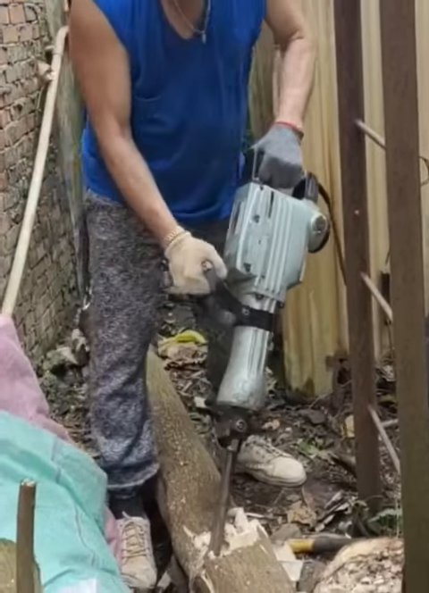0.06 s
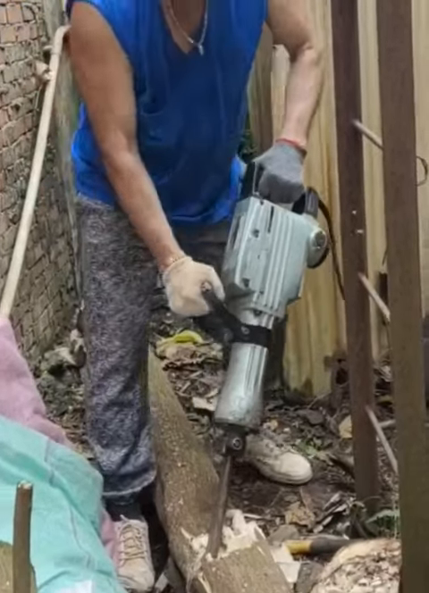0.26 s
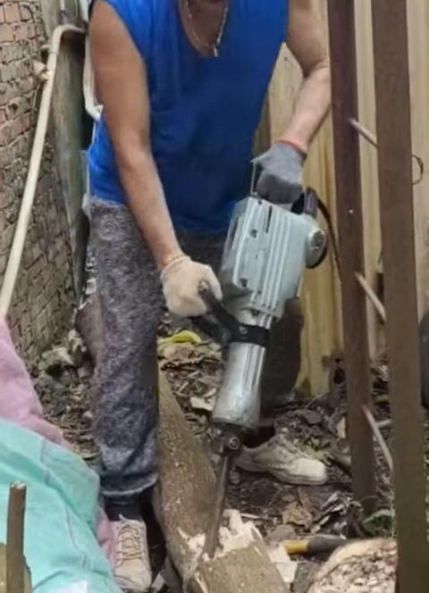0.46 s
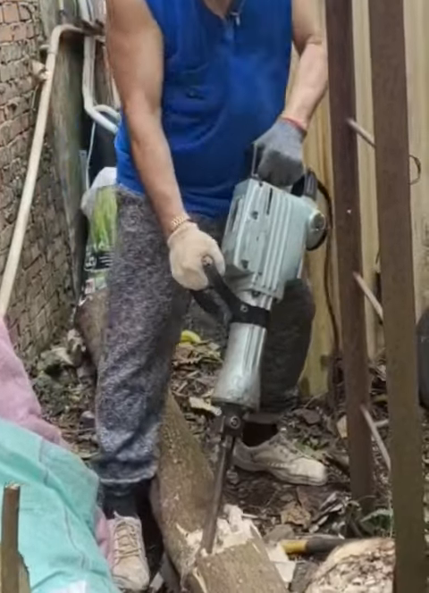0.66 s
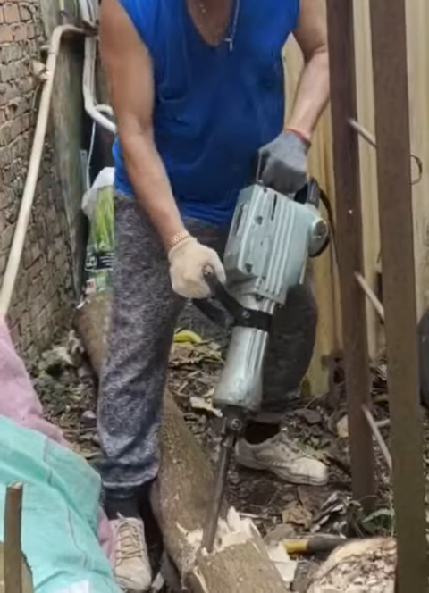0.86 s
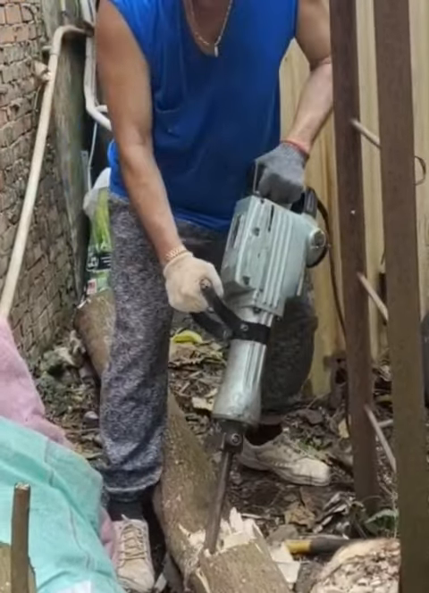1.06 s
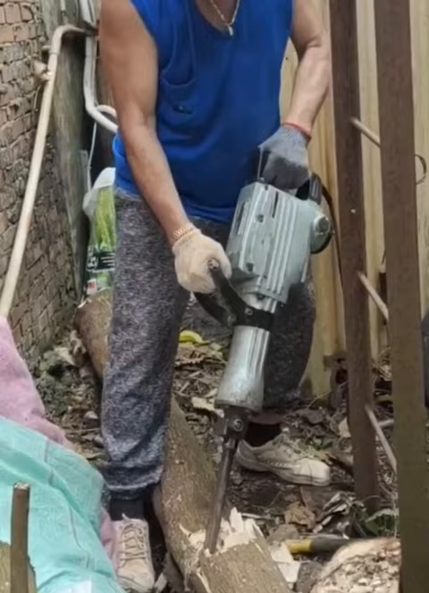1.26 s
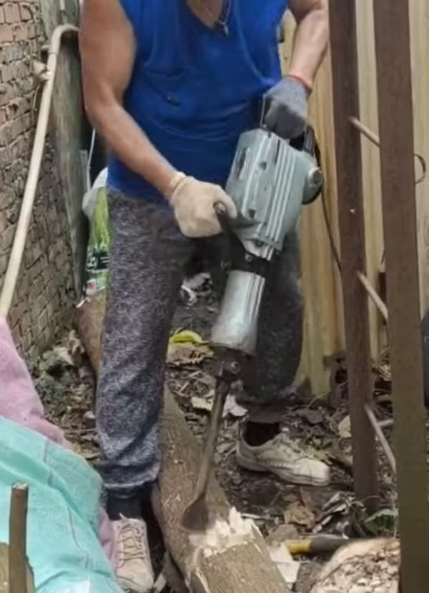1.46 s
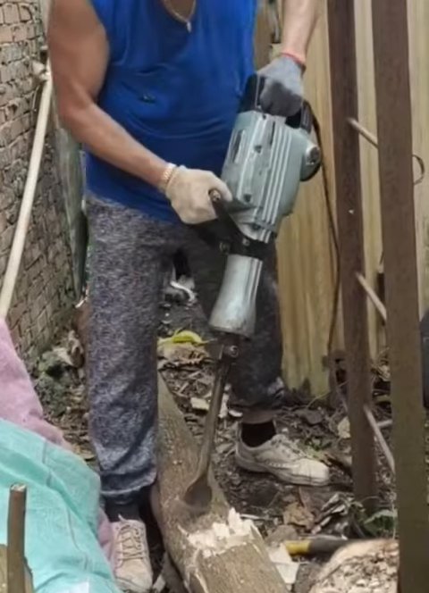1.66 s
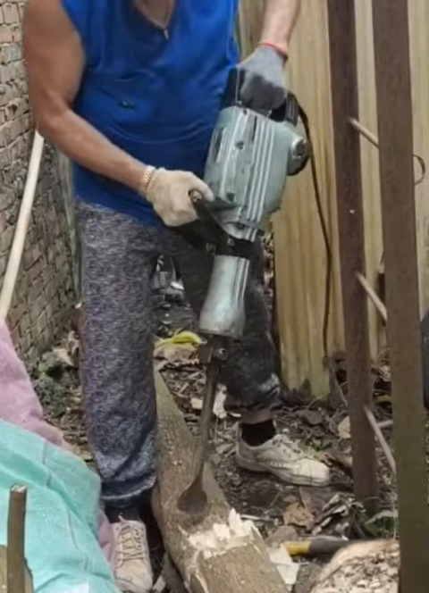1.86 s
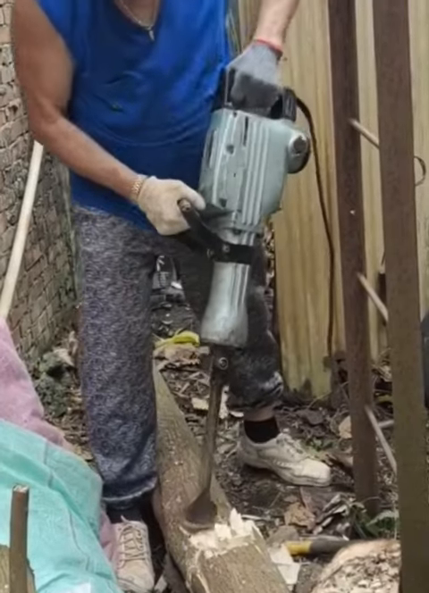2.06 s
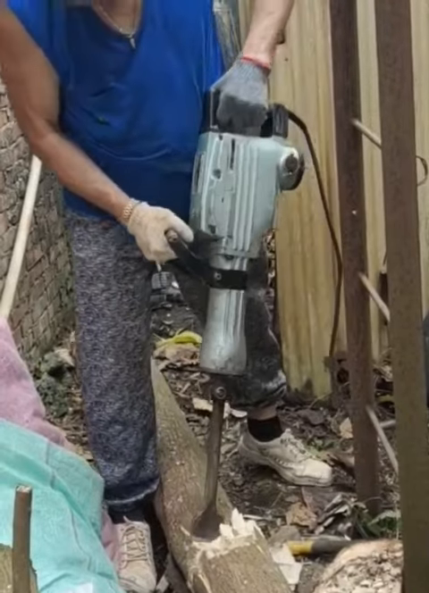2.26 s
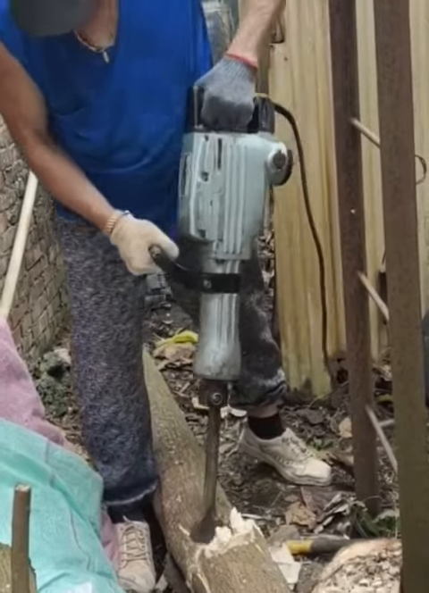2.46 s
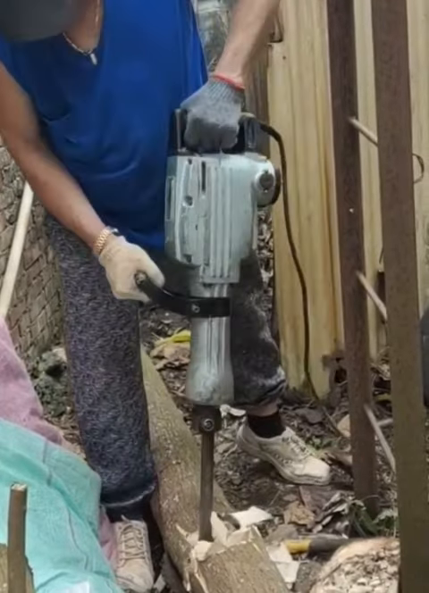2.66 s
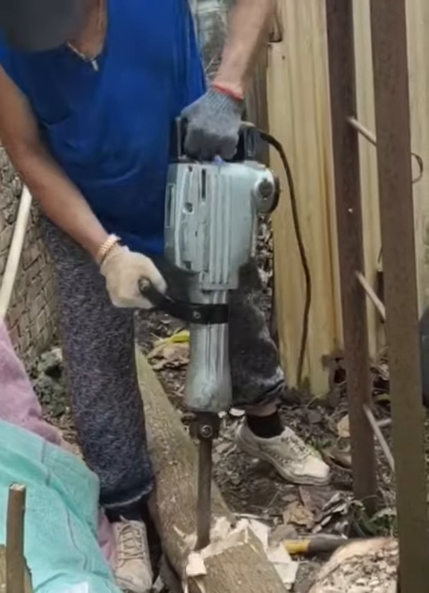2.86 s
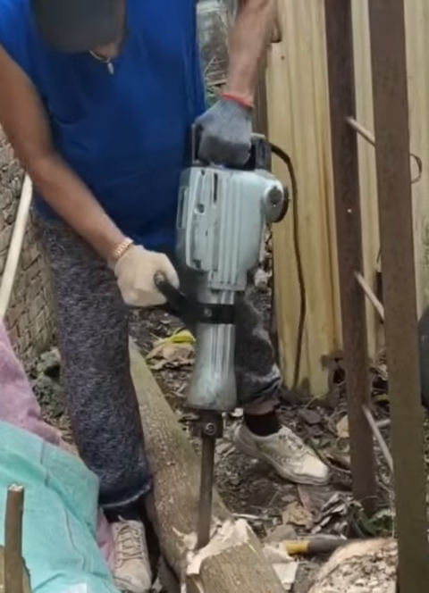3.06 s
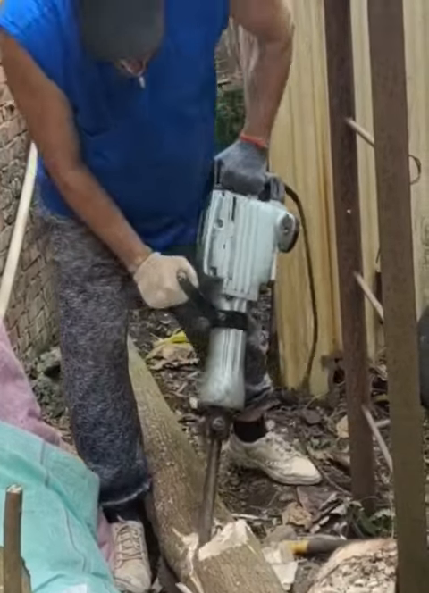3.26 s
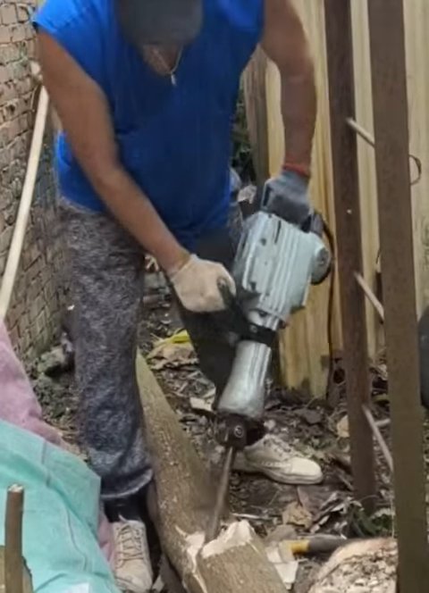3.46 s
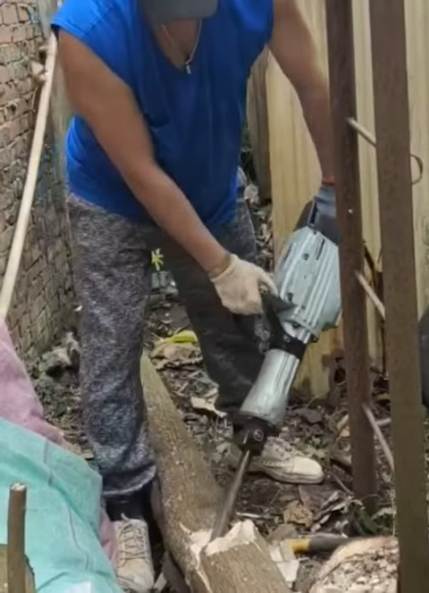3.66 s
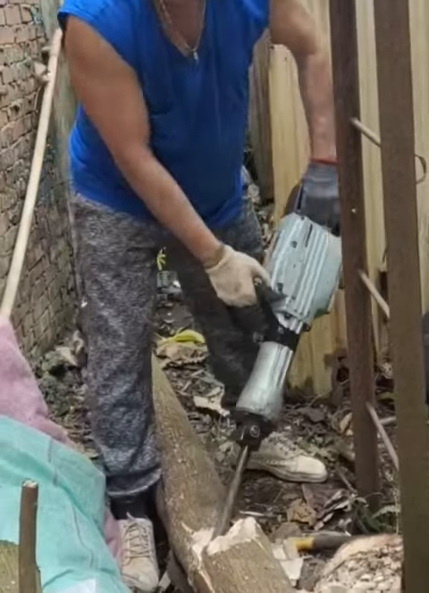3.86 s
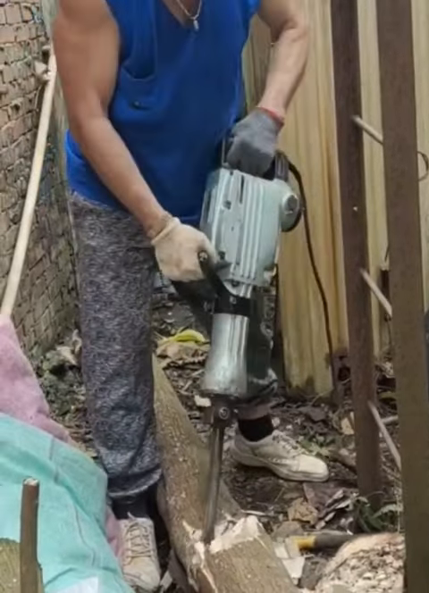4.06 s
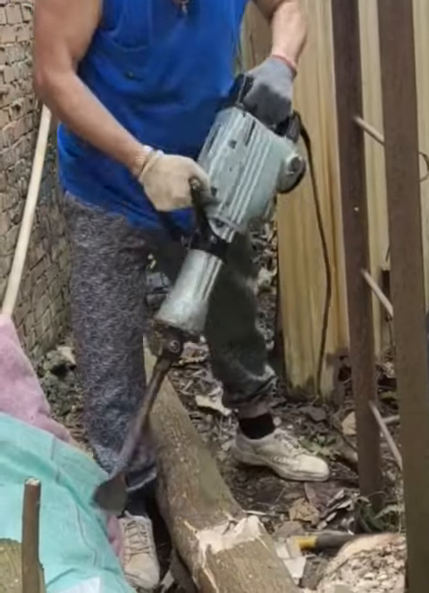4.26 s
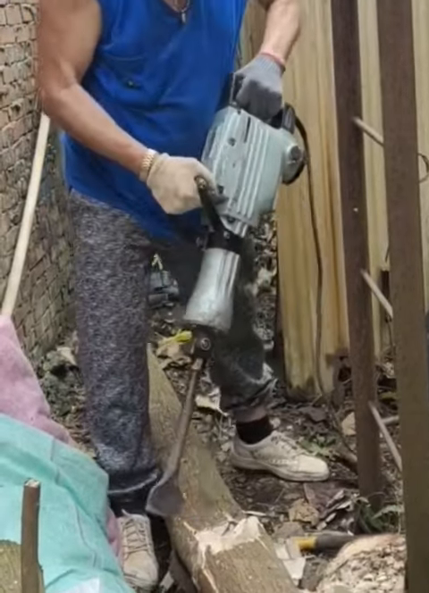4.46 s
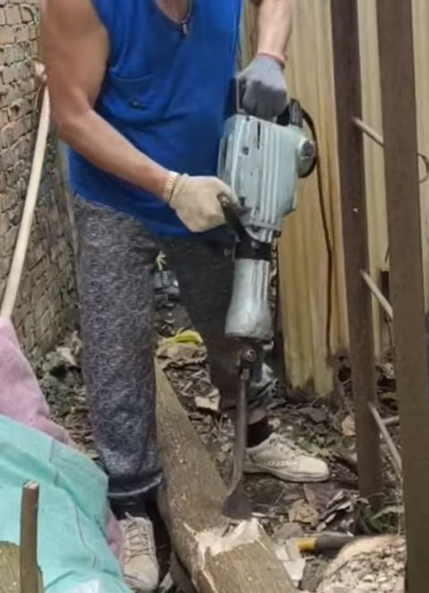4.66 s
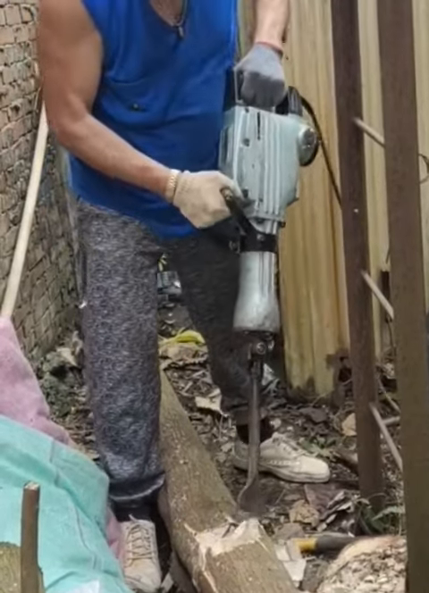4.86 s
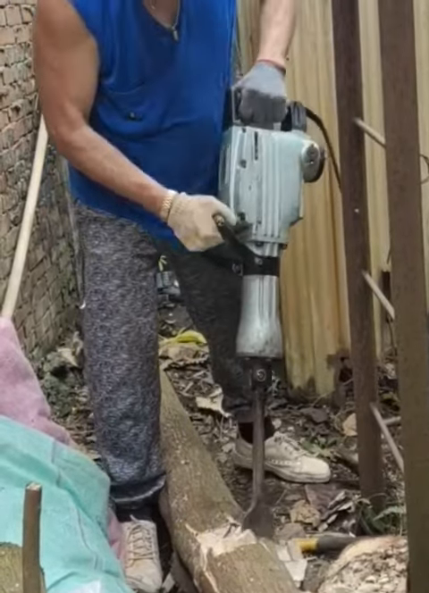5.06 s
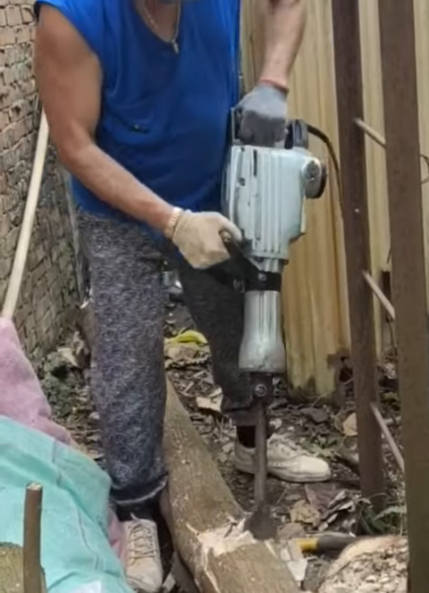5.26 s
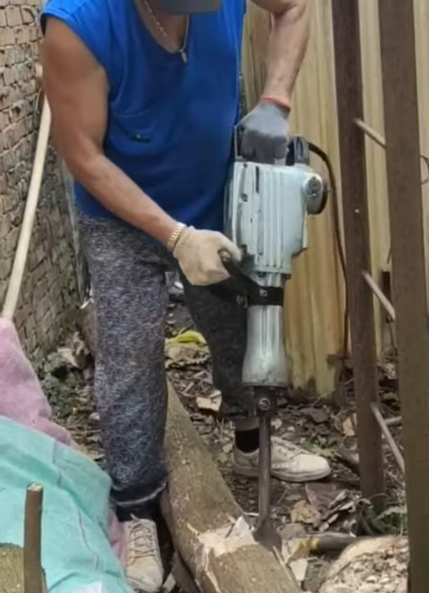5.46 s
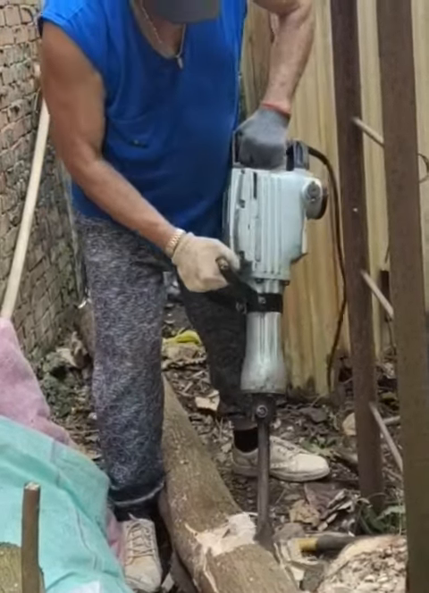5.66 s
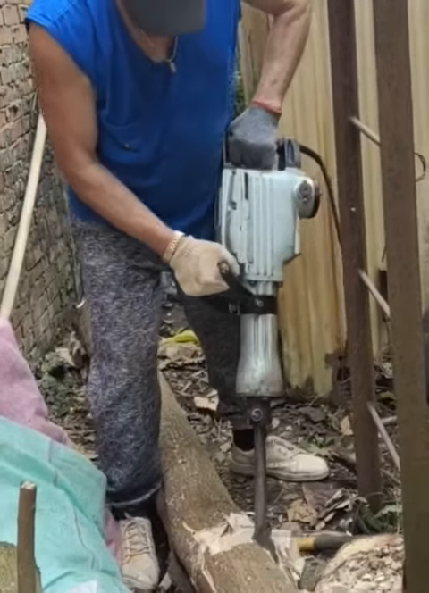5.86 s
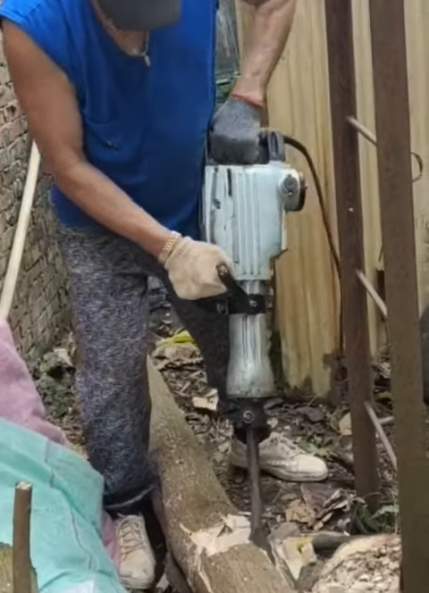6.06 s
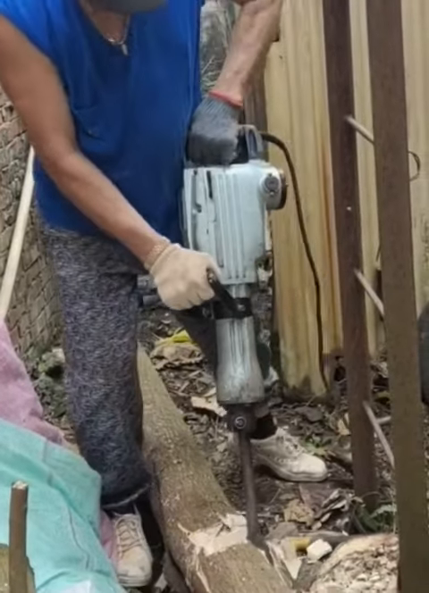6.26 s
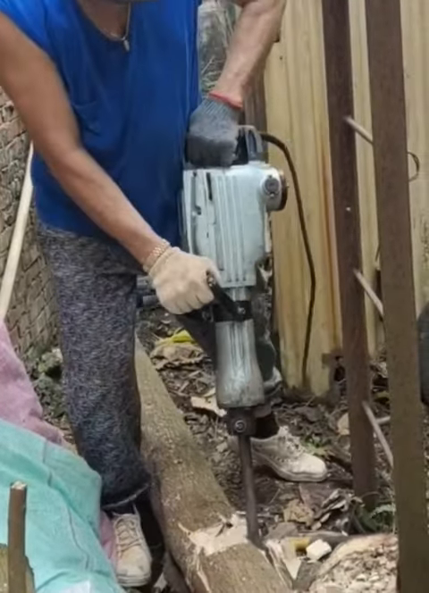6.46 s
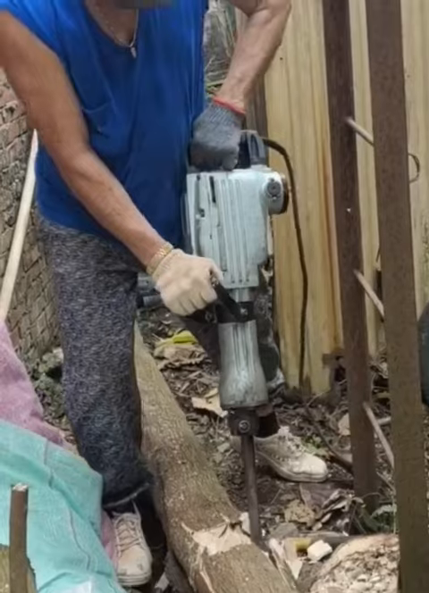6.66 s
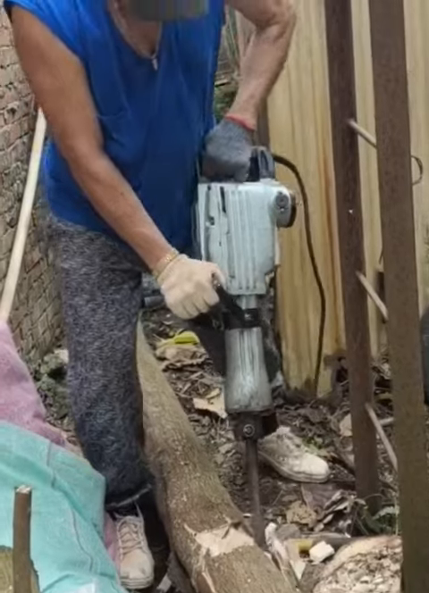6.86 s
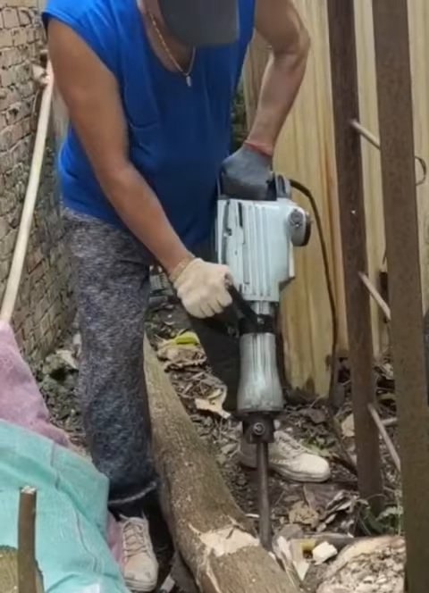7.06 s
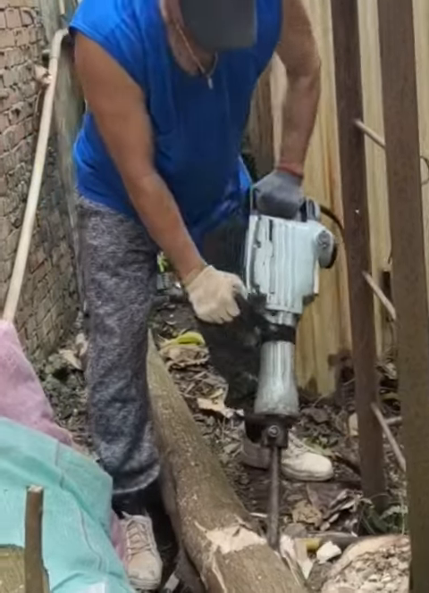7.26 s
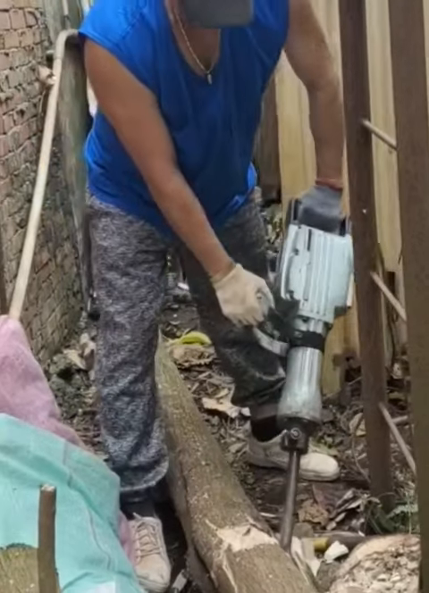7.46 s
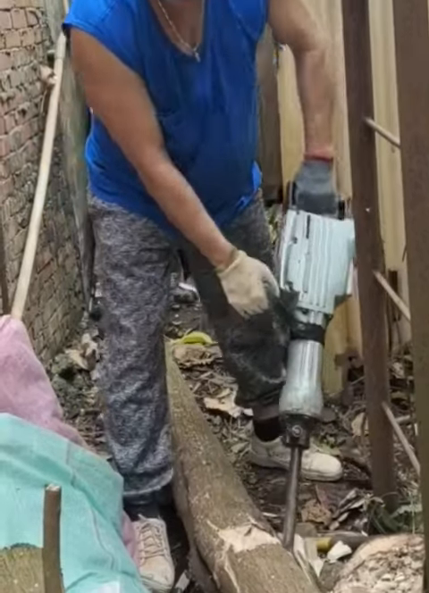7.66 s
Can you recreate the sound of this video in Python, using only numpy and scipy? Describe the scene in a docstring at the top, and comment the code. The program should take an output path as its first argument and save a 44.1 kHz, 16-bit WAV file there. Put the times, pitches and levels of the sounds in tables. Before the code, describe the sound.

Several single thuds of an idle hammer's blade into wood come first, each followed by light metal rattles and crumbly chips. Then the motor drives a rapid rattling run of blows, ringing steel over hollow log knocks, which winds down into bright clinks. A short pause, then another longer run, slowing again. Close and slightly overloaded, with short reflections from wall and fence over faint low rumble.

```python
"""Demolition hammer chipping a log

An electric hammer chips a log in a narrow yard, close to a phone. First the chisel is thrust in by hand,
then the motor runs in two bursts of blows that speed up and slow down. Each blow shakes damped tones of log,
housing and chisel steel. The loose chisel clinks in its holder and chips rustle, both made of noise bursts
or grains. A low town rumble of shaped noise lies under all."""
import sys
import numpy as np
from scipy import signal
from scipy.fft import rfft, irfft, next_fast_len
from scipy.io import wavfile

SR = 44100
rng = np.random.default_rng(int(sys.argv[2]) if len(sys.argv) > 2 else 0)


def to_wav(s):
    """Save 16-bit WAV."""
    ch = np.atleast_2d(s).T  # columns
    pcm = np.round(np.clip(ch, -1, 1) * 32767)  # PCM
    wavfile.write(sys.argv[1], SR, pcm.astype(np.int16))


N = 340452  # length in samples

# All levels are relative: the code adds further gains to them.
# In every table of tones, each row: pitch in Hz, level in dB, time to fade by 60 dB in seconds.
# In every noise spectrum, each row: pitch in Hz, level in dB per Hz.

# Blows of the piston. Each row: start in seconds, strength in dB, boom of the log in dB,
# wood knock in dB, chisel ring in dB.
PISTON_BLOWS = [(2.4772, -23, -46, -55, -30), (2.598, -15.5, -32, -31, -13.5),
                (2.6629, -17, -33.5, -29, -9.5), (2.718, -19.5, -31, -32, -8), (2.7706, -12, -44, -21, -9),
                (2.82, -17, -31, -28, -7.5), (2.8635, -11.5, -39, -21.5, -5.5),
                (2.9078, -15, -33, -23.5, -10), (2.9551, -15.5, -24.5, -24.5, -18),
                (2.9987, -13, -21.5, -25, -23), (3.0452, -16.5, -20, -27, -27),
                (3.085, -11.5, -19.5, -30, -16), (3.1288, -9.5, -21, -22.5, -24),
                (3.1738, -16, -21, -26, -16), (3.22, -16.5, -23.5, -35, -16), (3.261, -13, -22, -33, -23),
                (3.3036, -12.5, -23, -31, -12.5), (3.3482, -16.5, -24, -17, -10.5),
                (3.3849, -11, -20, -23.5, -14), (3.4314, -12.5, -25, -32, -13), (3.473, -10, -25, -42, -14),
                (3.5243, -12, -24.5, -25, -16), (3.576, -13.5, -28, -20, -11.5),
                (3.6355, -10.5, -21.5, -26, -12), (3.703, -12, -27, -19, -10),
                (3.785, -12, -22.5, -18.5, -9.5), (3.8827, -7.5, -20.5, -20, -40),
                (4.0018, -11, -25, -13.5, -13), (4.157, -10, -20, -17.5, -17),
                (5.3022, -19.5, -66, -22, -21), (5.371, -15, -49, -34, -12.5),
                (5.438, -10.5, -39, -24.5, -10.5), (5.493, -15, -33, -49, -17),
                (5.5477, -8.5, -25, -27.5, -8), (5.5999, -15.5, -30, -21, -23), (5.6462, -10, -24, -19, -9),
                (5.6915, -10.5, -29, -21.5, -11), (5.7419, -9.5, -36, -20.5, -16),
                (5.7874, -23, -31, -18.5, -12), (5.8328, -11.5, -35, -20, -16),
                (5.88, -12, -30, -20.5, -12), (5.9239, -9.5, -30, -19, -25),
                (5.9694, -9, -24.5, -19.5, -15), (6.014, -11, -28, -19, -17.5),
                (6.0572, -8.5, -29, -15, -17), (6.101, -8.5, -24, -18.5, -25),
                (6.1462, -8.5, -24, -16.5, -30), (6.1881, -9, -25, -17, -19),
                (6.2334, -8.5, -21, -18.5, -23), (6.274, -10.5, -21.5, -19, -24),
                (6.311, -7.5, -24, -18, -32), (6.3523, -7.5, -29, -16, -37), (6.3906, -8, -25, -16.5, -13),
                (6.432, -7.5, -29, -19.5, -31), (6.4735, -10.5, -28, -16.5, -22),
                (6.5139, -9.5, -30, -18.5, -21), (6.552, -9.5, -22.5, -20.5, -14),
                (6.5943, -8.5, -21.5, -19.5, -12), (6.6405, -10.5, -25, -15.5, -18),
                (6.6797, -10, -24, -19.5, -23), (6.7185, -11, -25.5, -20.5, -10),
                (6.761, -13.5, -22, -26, -11.5), (6.8045, -16.5, -25, -25, -12.5),
                (6.849, -12.5, -24, -25, -12.5), (6.893, -11.5, -22, -24, -13.5),
                (6.9381, -10.5, -23.5, -21, -13.5), (6.982, -14.5, -21, -21.5, -7),
                (7.0287, -17, -27, -22, -6), (7.0733, -13, -28, -23, -16), (7.1162, -14, -23, -21, -17),
                (7.1603, -11.5, -20, -18.5, -10.5), (7.2096, -8, -22, -20.5, -18),
                (7.2569, -11, -23, -20, -13), (7.3102, -7.5, -20, -14, -12.5),
                (7.3713, -7.5, -24, -12, -10), (7.4392, -9.5, -25, -12.5, -11),
                (7.5225, -8.5, -19, -17.5, -20), (7.6166, -10.5, -21, -16, -17)]
# How much each part answers a blow. One row: housing, barrel and crack in dB over strength;
# ground, trunk and log in dB over boom; knock in dB; contact time in ms; amount of splintering in the knock.
BLOW_ANSWER = (-2, -5.5, -14, -9.5, -11.5, 5, 0.5, 4, 1.14)
# Tones of the steel chisel, as in every table of tones.
CHISEL_TONES = [(6084, 4.5, 0.047), (6175, 0.5, .05), (6184, -1.5, 0.065), (6280, -2.5, 0.087),
                (6308, 7, 0.043), (6510, -10, 0.027)]
CHISEL_DB = 7


def hammer():
    """The seat of the blade in the wood shifts the balance of the parts; the piston also makes the chisel sing."""
    start, strength, boom, knock, chisel = np.transpose(PISTON_BLOWS)
    when, _, _, _, *seat = np.concatenate(MOTOR_RUNS).T
    extra_crack, extra_ground, extra_trunk = (np.interp(start, when, level) for level in seat)
    housing_db, barrel_db, crack_db, ground_db, trunk_db, *rest = BLOW_ANSWER
    parts = (housing_db, barrel_db, crack_db + extra_crack,
             ground_db + extra_ground, trunk_db + extra_trunk, *rest)
    chisel_push = bursts(start, chisel + CHISEL_DB, np.full(len(start), 2.9))
    chisel_ring = ring(chisel_push, CHISEL_TONES, vary_db=3.0, wander_s=0.18)
    return strikes(start, strength, boom, knock, parts) + chisel_ring


# The idle machine thrust into the wood by hand, with its rebounds.
# Each row: start in seconds, strength in dB, boom of the log in dB, wood knock in dB.
HAND_THRUSTS = [(0.0249, -8.5, -24.5, -23), (0.0299, -24, -39, -18.5), (0.3831, -8.5, -33, -21),
                (0.39, -12, -33, -17.5), (0.795, -11, -43, -21), (1.1227, -17.5, -40, -24.5),
                (1.1271, -34.5, -33, -29), (1.4236, -11, -37.5, -23.5)]
# How much each part answers a thrust; same order and units as for a blow.
THRUST_ANSWER = (-0.5, -3.5, -21, -27.5, -16.5, 12, 5.5, 2, 1.77)


def thrusts():
    """Pushing the blade in by hand shakes the same parts as a blow, in another balance."""
    return strikes(*np.transpose(HAND_THRUSTS), THRUST_ANSWER)


# Tones of the machine: its housing and its barrel.
HOUSING_TONES = [(1066, -8, 0.0073), (1352, 2.5, 0.0087), (1566, -9, 0.05), (1740, 5.5, 0.0053),
                 (1862, -3.5, 0.033), (1986, -2, 0.015), (2132, -1.5, 0.031), (2264, -0.5, 0.011),
                 (2475, -3.5, 0.027), (2590, 4.5, 0.0084)]
BARREL_TONES = [(2770, 9.5, 0.004), (3088, -7.5, 0.041), (3370, 0.5, 0.0097), (3778, -5, 0.04),
                (3930, -5.5, .025), (4220, 1.5, 0.013), (4830, 3.5, 0.0043), (5310, -0.5, 0.011),
                (5730, -1, 0.016), (6365, 4.5, 0.0053)]
# Tones of the ground, of the trunk, and of the log.
GROUND_TONES = [(83, -11, 0.033), (124, -4, 0.07), (160.6, -14, 0.026)]
TRUNK_TONES = [(248.6, -1.5, 0.3), (270.2, -0.5, 0.33), (322, 1, 0.14), (337.4, 10, 0.087)]
LOG_TONES = [(373, -3.5, 0.017), (414, -4, 0.076), (445.3, 2, 0.058)]
# Tones of the knock on the wood, and one short thump that goes with it.
KNOCK_TONES = [(560, -3.5, 0.041), (625.5, 1, 0.031), (718, -7.5, 0.06), (774, 3, 0.027), (874, -3, 0.063),
               (961, -6, 0.06), (1070, -7.5, 0.023), (1340, 0, 0.076)]
THUMP_TONE = [(814, 0, 0.014)]
# Noise spectrum of sharp treble: cracks, ticks, brush hiss and the fine top of the chips.
TREBLE_SPECTRUM = [(6300, -52.5), (6900, -17), (7500, -5), (7950, -12.5), (8400, -3.5), (9000, -6.5),
                   (10800, -12), (12700, -13), (14100, -16), (15300, -24.5), (16000, -50), (16600, -73.5)]
SCATTER_DB, CONTACT_SPREAD = 1.23, 0.11  # from hit to hit; the second is a share of the contact time
WOOD_LAG_MS = 1.49  # the shock runs down the chisel before the blade pushes the wood
THUMP_DB = -10  # over the knock


def strikes(start, strength, boom, knock, parts):
    """Each impact rings machine, ground and wood; the wood feels a rounded push, the metal parts a rattle."""
    *answer_db, knock_db, contact_ms, splinter = parts
    scatter = SCATTER_DB * rng.standard_normal((6, len(start)))
    housing, barrel, crack = (strength + db + s for db, s in zip(answer_db[:3], scatter[:3]))
    ground, trunk, log = (boom + db + s for db, s in zip(answer_db[3:], scatter[3:]))
    ms = contact_ms * np.exp(CONTACT_SPREAD * rng.standard_normal(len(start)))

    housing_push = bursts(start + WOOD_LAG_MS / 1000, housing, ms, rise_ms=0.36, ragged=0.64)
    barrel_push = bursts(start, barrel, 0.91 * ms, rise_ms=0.28)
    machine = (ring(housing_push, HOUSING_TONES, vary_db=0.5, wander_s=0.15)
               + ring(barrel_push, BARREL_TONES, vary_db=2.6, wander_s=0.076))

    thud = ring(bursts(start, ground, ms, ragged=0.3), GROUND_TONES)
    trunk_push, log_push = pushes(start, trunk, ms, 0.15), pushes(start, log, ms, 0.111)
    wood = (ring(trunk_push, TRUNK_TONES, vary_db=1.2, flip=0.96, wander_s=0.099)
            + ring(log_push, LOG_TONES, vary_db=2.1, flip=0.9, wander_s=0.12))

    dent = pushes(start, knock + knock_db, 2.02 * ms, splinter)
    wood_knock = ring(dent, KNOCK_TONES, vary_db=0.5, flip=0.83, wander_s=0.24)
    thump = undb(THUMP_DB) * ring(dent, THUMP_TONE, vary_db=4.2)
    treble_crack = colour(bursts(start, crack, 1.85 * ms, rise_ms=0.18), TREBLE_SPECTRUM)
    return machine + thud + wood + wood_knock + thump + treble_crack


PUSH_MS = 0.045  # time from the start of the push to its peak
WOOD_LOW_HZ = 213  # the log is too thin to radiate below this


def pushes(start, db, ms, splinter):
    """The blade dents the wood with one rounded push; some splintering roughens it."""
    t = np.arange(256) / SR * 1000 / PUSH_MS
    out = np.zeros(N + 256)
    first = ((start + WOOD_LAG_MS / 1000) * SR).astype(int)
    for i, gain in zip(first, undb(db)):
        out[i:i + 256] += 6 * gain * t * np.exp(-t)
    return highpass(out[:N] + splinter * bursts(start, db, ms, ragged=0.9), 4, WOOD_LOW_HZ)


# The chisel knocking in its holder. Each row: start in seconds, clatter in dB, shank knock in dB,
# collar ring in dB, rattle length in ms (the code stretches or shortens it for some parts).
HOLDER_CLINKS = [(0.291, -34, -38, -37.5, 30), (0.327, -28, -30.5, -25.5, 10), (0.338, -26, -46.5, -35, 12),
                 (0.7073, -28, -59, -57, 10), (0.7198, -23, -41, -35, 18), (0.739, -11.5, -36, -38, 20),
                 (1.0066, -22, -42, -39, 13), (1.0457, -25, -32, -25, 5.8), (1.0555, -19, -35.5, -33, 12),
                 (1.078, -29, -43, -39, 8.9), (1.348, -22, -39.5, -34.5, 25), (1.75, -35.5, -51.5, -52, 19),
                 (2.3234, -48, -65, -66, 19), (2.3915, -57, -59, -82.5, 10), (4.357, -12, -17, -46.5, 7.5),
                 (4.4019, -8.5, -34.5, -41.5, 14), (4.422, -11, -43.5, -41.5, 13),
                 (4.445, -21, -43, -44.5, 24), (4.517, -27, -57, -60, 85), (4.591, -41, -54, -62.5, 36),
                 (4.6813, -22.5, -53, -44, 35), (4.8194, -23, -69, -53, 40)]
# Clear rings of the freed chisel. Each row: start in seconds, pitch in Hz, level in dB,
# time to fade by 60 dB in seconds.
CHISEL_PINGS = [(2.236, 2270, -72, 0.045), (2.237, 3400, -76, .06), (2.32, 3300, -72, .04),
                (2.388, 1300, -62, 0.037), (2.463, 1300, -45, .03), (4.358, 9150, -41.5, 0.12),
                (4.358, 10690, -40, 0.25), (4.358, 12940, -55, .3), (4.358, 6200, -42, .06),
                (4.359, 5420, -48, 0.092), (4.404, 3840, -33.5, 0.099), (4.421, 3720, -43, .07),
                (4.445, 3670, -48.5, 0.09)]
# Tones of the holder, of the chisel's shank, and of the collar.
HOLDER_TONES = [(1340, 4, 0.0072), (2200, 8, 0.0048), (2770, -6, 0.016), (3180, 1.5, 0.0064),
                (4360, -2.5, 0.013), (6000, 4.5, 0.0023)]
SHANK_TONES = [(5260, -4.5, 0.018), (5500, -14, 0.076), (5760, -20, 0.022), (6160, -5, 0.012)]
COLLAR_TONES = [(3070, -8.5, 0.0087), (3470, -1, 0.015), (3970, -1.1, 0.01), (4470, -3, 0.0071)]
CLINK_TOP_HZ = 9600


def clinks():
    """Steel on steel in the holder: a short knock on the shank, then a rattle that may ring the collar."""
    start, clatter, shank, collar, ms = np.transpose(HOLDER_CLINKS)
    holder_rattle = ring(bursts(start, clatter - 16, ms, rise_ms=0.92), HOLDER_TONES)
    shank_knock = ring(bursts(start, shank + 9, 0.064 * ms), SHANK_TONES)
    collar_push = bursts(start, collar + 3, 1.17 * ms, rise_ms=1.2, ragged=0.69)
    tick = lowpass(colour(bursts(start, shank - 0.2, 1.4 * ms), TREBLE_SPECTRUM), 3, CLINK_TOP_HZ)
    pings = 0
    for at, hz, db, t60 in CHISEL_PINGS:
        pings = pings + ring(bursts([at], [db], [11], ragged=0.77), [(hz, 0, t60)], vary_db=1)
    return holder_rattle + shank_knock + ring(collar_push, COLLAR_TONES) + tick + undb(16.5) * pings


# Two runs of the motor. Each row: time in seconds, gear clatter in dB, drone into the wood in dB,
# buzz of the loose chisel in dB, extra treble crack in dB, extra ground thud in dB, trunk over log in dB.
MOTOR_RUNS = [
    [(2.476, -26.5, -30.5, -92, 16.5, 0.5, -15), (2.64, -34.5, -40, -24, 7.5, 8, -3),
     (2.81, -28, -50, -22, 2, 13, 16), (3.13, -22, -22.5, -21.5, 1.5, -1, -1.5),
     (3.31, -28, -25.5, -24, 4.5, -3, 4), (3.49, -25.5, -30.5, -18.5, 1.5, 8, 5.5),
     (3.85, -37.5, -30.5, -36, 3.5, 0, 2), (4.19, -35, -37, -41, -5, -4, -23),
     (4.36, -39, -64, -49, 11, -4, -9)],
    [(5.3, -24, -74, -86, 20, -11, 1), (5.36, -35, -62, -49, 6.5, 2, -2), (5.5, -35, -69, -20, 4.5, 14, -8),
     (5.66, -24, -47, -12.5, 5, 10, 9), (5.87, -25.5, -42.5, -20.5, -2, 5, 16.5),
     (6.36, -28, -25, -25.5, -9, -22, -0.5), (6.79, -22, -30.5, -25.5, 1.5, -7, 14),
     (7.24, -31, -24.5, -17.5, 0.5, -10, 5.5), (7.4, -34, -36, -30.5, -5, -17, 5),
     (7.72, -36.5, -58, -36, -7, -27, -21)],
]
SHAKE_DB, SHAKE_S = -1, 0.0098  # extra rattle after a blow and how fast it fades
BRUSH_TOP_HZ = 14000


def motor():
    """Gear teeth shake housing, wood and chisel without pause during each run; the brushes hiss."""
    clatter, drone, buzz, treble, _, trunk = curves(MOTOR_RUNS)
    t, blows = np.arange(N) / SR, np.array(PISTON_BLOWS)[:, 0]
    last_blow = blows[np.maximum(np.searchsorted(blows, t) - 1, 0)]
    shaken = 1 + undb(SHAKE_DB) * np.exp(-np.abs(t - last_blow) / SHAKE_S)  # rattles hardest just after a blow
    teeth = unit(grit(3000, 1.2) * undb(1.36 * walk(60)) * shaken)

    machine = clatter * ring(teeth, HOUSING_TONES + BARREL_TONES, vary_db=3.0)
    trunk_drone = undb(-10) * drone * trunk * ring(teeth, TRUNK_TONES, vary_db=0.5, wander_s=0.34)
    log_drone = undb(-2.0) * drone * ring(teeth, LOG_TONES + KNOCK_TONES, vary_db=2.5, wander_s=0.13)
    chisel_buzz = undb(-7.5) * buzz * ring(teeth, CHISEL_TONES, vary_db=3.0, wander_s=0.15)
    hiss = lowpass(colour(grit(11000, 0.65), TREBLE_SPECTRUM), 2, BRUSH_TOP_HZ)
    hiss_gain = undb(-21.5) * buzz + undb(-26.5) * clatter * treble
    return machine + trunk_drone + log_drone + chisel_buzz + hiss_gain * hiss


# Chips falling and the blade dragging. Each row: start in seconds, hold in seconds, bark in dB, chips in dB.
RUSTLE_SPILLS = [(0., 0.12, -37, -38), (0.204, 0.11, -52, -47), (0.385, 0.033, -48, -40.5),
                 (0.51, 0.57, -54, -77), (0.818, 0.097, -47, -47), (1.14, 0.072, -59, -51),
                 (1.428, 0.093, -70, -48), (1.747, 0.79, -76.5, -85), (2.244, 0.088, -85.5, -69.5),
                 (2.4, 0.1, -62, -63), (4.36, 0.047, -41.5, -39.5), (4.48, 0.15, -68, -53.5),
                 (4.612, 0.071, -46.5, -46.5), (4.816, 0.022, -53, -52), (5.28, .04, -60, -51.5)]
# Noise spectra of bark and of wood chips.
BARK_SPECTRUM = [(250, -26), (400, -4), (750, 1), (1100, -14), (1600, -51.5)]
CHIPS_SPECTRUM = [(700, -46), (1200, -6.5), (2260, -8), (3500, -9.5), (4500, -16.5), (6300, -19.5),
                  (7000, -48)]
RISE_DB_S, FALL_DB_S = 381.5, 136.5  # swell and trickle away, dB per second
RUSTLE_TREBLE_DB, CHIPS_TOP_HZ = -14, 10000


def rustle():
    """Dense small grains of bark and wood chips; each spill swells, holds and trickles away."""
    t, bark, chips = np.arange(N) / SR, 0, 0
    for start, hold, bark_db, chips_db in RUSTLE_SPILLS:
        swell = -RISE_DB_S * np.maximum(start - t, 0)
        fall = -FALL_DB_S * np.maximum(t - start - hold, 0)
        bark = bark + undb(bark_db + swell + fall)
        chips = chips + undb(chips_db + swell + fall)
    grains = grit(4700, 2.1) * undb(2 * walk(30))
    fine_top = undb(RUSTLE_TREBLE_DB) * lowpass(colour(grains, TREBLE_SPECTRUM), 3, CHIPS_TOP_HZ)
    return bark * colour(grains, BARK_SPECTRUM) + chips * (colour(grains, CHIPS_SPECTRUM) + fine_top)


WALL_MS, WALL_DB = 4.85, -15.5  # delay and level of the near wall


def wall_slap(hits):
    """The near wall sends back one early, weaker copy of the hits."""
    lag = int(WALL_MS * SR / 1000)
    return undb(WALL_DB) * np.r_[np.zeros(lag), hits[:-lag]]


# How long the yard rings. Each row: pitch in Hz, time to fade by 60 dB in seconds.
YARD_FADE = [(250, 0.52), (800, 0.55), (2500, 0.41), (7000, 0.15), (13000, 0.0073)]
YARD_DB = -10


def yard(x):
    """Wall and fence return a diffuse tail whose treble dies first."""
    t, tail = np.arange(SR // 2) / SR, 0
    between = [np.sqrt(a[0] * b[0]) for a, b in zip(YARD_FADE, YARD_FADE[1:])]
    edges = [60] + between + [20000]
    for (_, t60), low, high in zip(YARD_FADE, edges, edges[1:]):
        band_filter = signal.butter(2, [low, high], "band", fs=SR, output="sos")
        band = signal.sosfilt(band_filter, rng.standard_normal(len(t)))
        tail = tail + band * np.exp(-np.log(1000) * t / t60) / np.sqrt(t60)
    tail = tail * (1 - np.exp(-t / 0.0012))  # first echoes need a few ms to arrive
    return signal.fftconvolve(x, undb(YARD_DB) * tail / np.sqrt(np.sum(tail ** 2)))[:N]


# Noise spectrum of the town rumble.
TOWN_SPECTRUM = [(15, -42.5), (40, -28), (102, -5.5), (159, -4.5), (188, -4), (213, -8), (247, -7),
                 (316, -27), (349, -26.5), (425, -30.5), (650, -34.5), (911, -33.5), (1080, -39.5),
                 (9000, -65.5), (11700, -106), (19800, -120)]
TOWN_DB = -45


def town():
    """Steady noise, mostly low, whose level drifts slowly by about 1 dB."""
    return undb(TOWN_DB + 1.0 * walk(1.0)) * colour(rng.standard_normal(N), TOWN_SPECTRUM)


def ring(x, modes, vary_db=4.5, flip=-1, wander_s=0.04):
    """Damped tones; the contact point wanders, so each tone is hit more or less as time goes on."""
    out, power = 0, 0
    knots = np.arange(0, N + SR, max(wander_s, 0.03) * SR)
    for k, (hz, db, t60) in enumerate(modes):
        r, turn = np.exp(-np.log(1000) / (t60 * SR)), 2 * np.pi * hz / SR
        share = np.interp(np.arange(N), knots, undb(db + vary_db * rng.standard_normal(len(knots))))
        # flip sets the sign and size of each next tone
        out = out + signal.lfilter([0, flip ** k * r * np.sin(turn)], [1, -2 * r * np.cos(turn), r * r], share * x)
        power += undb(2 * db) / 2 / (1 - r * r)
    return out / np.sqrt(power)


def bursts(start, db, ms, rise_ms=1.0, ragged=0.78):
    """A push at each time: one firm shove mixed with a quick ragged run of contacts that dies away."""
    size = 2048 if max(ms) < 12 else 4096
    out, t = np.zeros(N + size), np.arange(size) / SR * 1000
    shove = 6 * np.exp(-t / 0.067)
    for at, gain, length in zip(start, undb(db), ms):
        i = int(at * SR)
        rattle = rng.standard_normal(size) * (1 - np.exp(-t / rise_ms)) * np.exp(-t / max(length, 0.3))
        out[i:i + size] += gain * (ragged * rattle + (1 - ragged) * shove)
    return out[:N]


def grit(rate, spread_db):
    """Noise made of tiny uneven contacts, about rate of them a second."""
    hit = rng.random(N) < rate / SR
    return unit(hit * rng.standard_normal(N) * undb(spread_db * rng.exponential(size=N)))


def walk(rate):
    """Random levels drawn rate times a second and joined by lines; scaled to rms 1."""
    levels = rng.standard_normal(512)
    return unit(np.interp(np.arange(N) / SR * rate, np.arange(len(levels)), levels))


def curves(spans):
    """Gains over time from dB curves, all but silent outside their spans."""
    t, total = np.arange(N) / SR, 0
    for span in spans:
        when, *columns = np.transpose(span)
        total = total + np.array([undb(np.interp(t, when, c, left=-120, right=-120)) for c in columns])
    return total


def colour(x, points):
    """Shape the sound by a spectrum table; white noise keeps its power."""
    hz, db = np.transpose(points)
    size = next_fast_len(len(x))
    log_hz = np.log(np.fft.rfftfreq(size, 1 / SR) + 1)
    gain = undb(np.interp(log_hz, np.log(hz), db, left=-90, right=-90))
    return irfft(rfft(x, size) * unit(gain), size)[:len(x)]


def lowpass(x, order, hz):
    """Weaken what lies above a pitch."""
    return signal.sosfilt(signal.butter(order, hz, fs=SR, output="sos"), x)


def highpass(x, order, hz):
    """Weaken what lies below a pitch."""
    return signal.sosfilt(signal.butter(order, hz, "high", fs=SR, output="sos"), x)


def undb(db):
    """Decibels to gain."""
    return 10 ** (np.asarray(db) / 20)


def unit(x):
    """Scale to rms 1."""
    return x / np.sqrt(np.mean(x ** 2))


def scene():
    """Machine, log and yard over the town; only the hits are echoed by wall and yard."""
    hits = hammer() + thrusts() + clinks()
    return (hits + wall_slap(hits) + yard(hits) + motor() + rustle() + town())[None]


BASS_HZ, TOP_HZ = 58.3, 16300


def record(dry):
    """The phone drops the deep bass, rounds the loudest peaks and cuts the top."""
    rounded = np.tanh(1.273 * highpass(dry, 2, BASS_HZ)) / 1.707
    return signal.sosfilt(signal.ellip(8, 0.2, 70, TOP_HZ, fs=SR, output="sos"), rounded)


dry = scene()
out = record(dry)
to_wav(out)
```